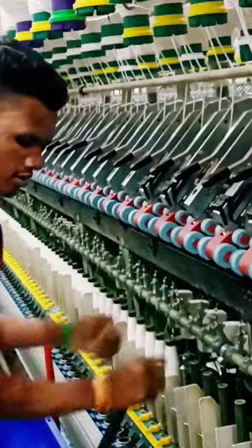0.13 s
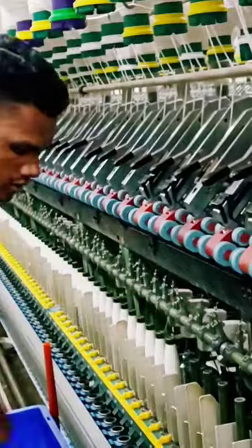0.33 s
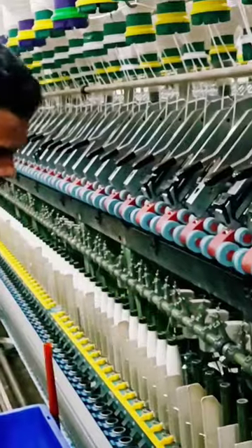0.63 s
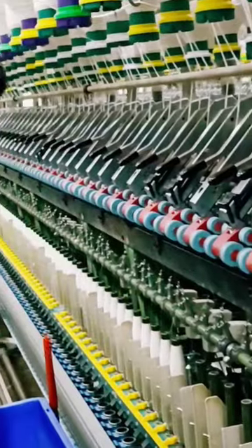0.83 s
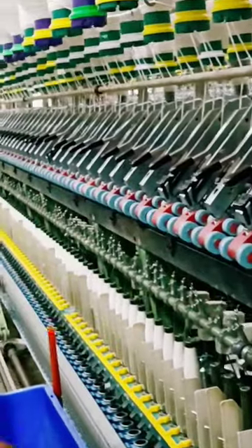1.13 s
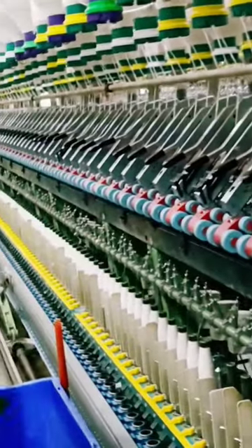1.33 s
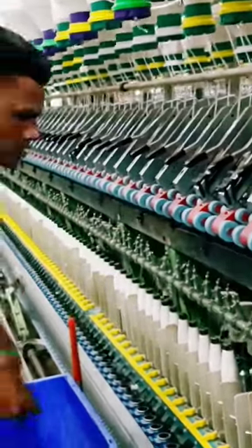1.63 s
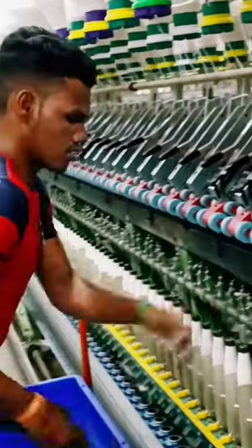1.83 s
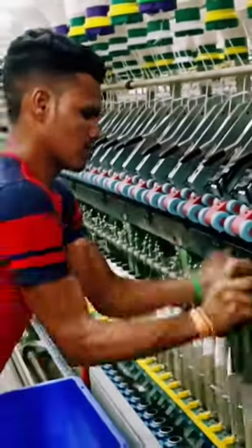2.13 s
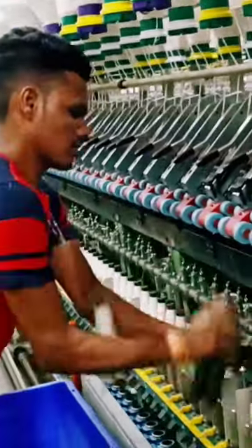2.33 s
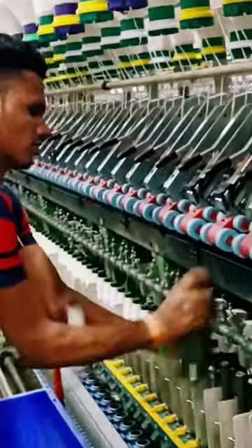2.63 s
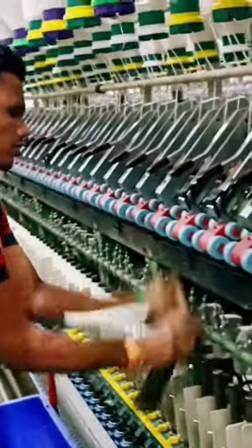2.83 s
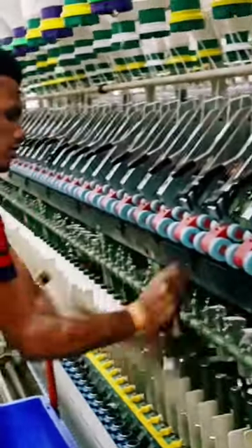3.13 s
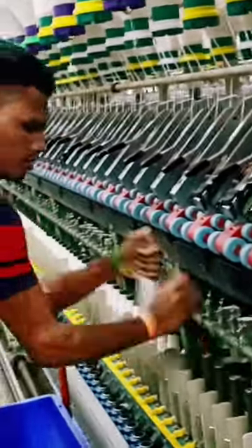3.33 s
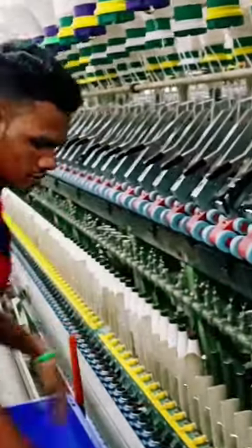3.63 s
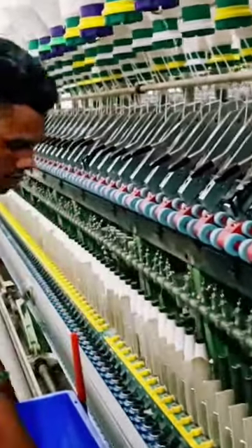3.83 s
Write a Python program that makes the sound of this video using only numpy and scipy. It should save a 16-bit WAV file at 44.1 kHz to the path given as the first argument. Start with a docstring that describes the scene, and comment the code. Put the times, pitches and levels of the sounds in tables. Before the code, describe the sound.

Inside a large spinning mill, constant broadband machine roar and fine ticking surround a wavering spindle drone; hollow bobbin tubes rattle close by a few times, picked up by a phone in slightly uneven stereo.

```python
"""Ring spinning hall

Rows of ring spinning frames run in a large hall, heard by a phone with two microphone ports.
Groups of spindles hum as wavering sines and narrow noise bands that beat; now and then plastic bobbin tubes
rattle in a crate close by, as swarms of clicks through resonances. Belts, rings and suction make a dense
roar with fine ticking, from shaped noise and clicks. The sound fades in from silence."""
import sys
import numpy as np
from scipy import signal
from scipy.fft import rfft, irfft
from scipy.io import wavfile
from scipy.ndimage import uniform_filter1d

SR = 44100
rng = np.random.default_rng(int(sys.argv[2]) if len(sys.argv) > 2 else 0)


def waveform_to_disk(signal):
    """Save audio, clipped to [-1, 1], as 16-bit WAV at the path in sys.argv[1]."""
    frames = np.transpose(np.atleast_2d(signal))
    scaled = np.clip(frames, -1, 1) * 32767
    samples = np.round(scaled).astype(np.int16)
    wavfile.write(sys.argv[1], SR, samples)


def invert_db(level):
    """Linear amplitude ratio for a level in decibels (20 dB per decade), elementwise."""
    return 10 ** (np.asarray(level, dtype=float) / 20)


N = 176400
HZ = np.fft.rfftfreq(N, 1 / SR)
T = np.arange(N) / SR


def curve(points):
    """Reads a table at every frequency, in straight lines on a log frequency axis."""
    p = np.array(points, float)
    return np.interp(np.log(HZ + 1), np.log(p[:, 0]), p[:, 1])


def set_rms(x, db):
    """Scales a signal to an rms level in dB."""
    return x * invert_db(db) / np.sqrt(np.mean(x ** 2))


def walk(rate):
    """Smooth random drift with about rate changes a second, rms 1."""
    hold = int(SR / rate)
    steps = np.repeat(rng.standard_normal(N // hold + 1), hold)
    smooth = uniform_filter1d(uniform_filter1d(steps, hold), hold)
    return set_rms(smooth[:N], 0)


def clicks(per_s, spread_db):
    """Single-sample clicks at random times, of either sign and uneven size, rms 1."""
    chance, sign, luck = rng.random((3, N))
    size = invert_db(spread_db * np.minimum(-np.log(1 - luck), 3))  # many small, few large
    return set_rms((chance < per_s / SR) * np.sign(sign - .5) * size, 0)


def whine(hz, spread_hz):
    """A sine of wavering pitch, rms 1, whose phase drifts between the two ports."""
    pitch = hz + spread_hz * walk(5)
    phase = 2 * np.pi * (np.cumsum(pitch) / SR + rng.random())
    port_drift = hz * 0.0014 * np.outer([.5, -.5], walk(3.94))  # radians, opposite at the two ports
    return np.sqrt(2) * np.sin(phase + port_drift)


def cluster(hz, spread_hz):
    """Many near-equal tones: a narrow noise band that beats at random, rms 1, partly unlike at the ports."""
    bell = np.exp(-.5 * ((HZ - hz) / spread_hz) ** 2)
    shared, opposed = (irfft(rfft(rng.standard_normal(N)) * bell, N) for _ in range(2))
    unlike = min(hz / 1250.0, 1)  # higher tones differ more
    return set_rms(shared + unlike * np.outer([1, -1], opposed), 0)


# Spindle groups. Each row: turning rate in Hz, spread of the fundamental in Hz,
# second harmonic in dB rms, third harmonic in dB rms.
SPINDLE_GROUPS = [(266.9, 0.45, -33.5, -43), (283.6, 0.55, -35, -43)]
# Fundamentals rising and falling as the spindles beat. Each row: time in seconds,
# first group's level in dB rms, second group's level in dB rms.
SPINDLE_BEATS = [(0.45, -33, -28.5), (0.53, -25.5, -36), (0.6, -31, -31), (0.67, -19.5, -27),
                 (0.91, -22, -32), (0.96, -32, -26.5), (1.19, -17, -33), (1.27, -22, -22),
                 (1.46, -48, -31.5), (1.52, -14.5, -29), (1.58, -43, -30), (1.76, -16.5, -30),
                 (1.85, -37, -24), (2.01, -39, -47), (2.05, -26, -31.5), (2.21, -31.5, -22),
                 (2.25, -28, -47), (2.3, -20.5, -35), (2.35, -31.5, -36), (2.44, -16, -34),
                 (2.48, -19.5, -32), (2.68, -34, -22.5), (2.95, -22, -25), (3.05, -41, -32),
                 (3.09, -17.5, -23), (3.26, -30.5, -29.5), (3.68, -19, -24.5), (3.84, -30, -28),
                 (3.93, -9, -37), (4.0, -72, -43)]


def spindles():
    """Each group hums at its turning rate, swelling as its spindles beat, with two blurred overtones."""
    beats = np.array(SPINDLE_BEATS, float)
    out = 0
    for k, (hz, spread, second_db, third_db) in enumerate(SPINDLE_GROUPS):
        beat_db = np.interp(T, beats[:, 0], beats[:, k + 1])
        out = out + invert_db(beat_db) * whine(hz, spread)
        out = out + invert_db(second_db) * cluster(2 * hz, 9.4 * spread)
        out = out + invert_db(third_db) * cluster(3 * hz, 10.0 * spread)
    return out


# Wavering motor, shaft and distant spindle tones. Each row: pitch in Hz, spread in Hz, level in dB rms.
MACHINE_TONES = [(191, 0.6, -38), (274.1, 1.56, -34), (393, 1, -46.5), (551.6, 5.4, -35.5), (580, 3.5, -44),
                 (417.4, 11.3, -40), (495, 2.5, -48), (213.3, 3, -43.5), (835, 2, -40), (1176, 0.43, -35),
                 (1633, 5, -40), (1860, 4, -53), (2480, 8, -44), (2636, 10, -47)]


def machine_tones():
    """Motors, shafts and distant spindles, each a narrow band of near-equal tones beating at random."""
    return sum(invert_db(db) * cluster(hz, spread) for hz, spread, db in MACHINE_TONES)


# Rattles of tubes in the crate. Each row: peak in seconds, level at the peak in dB,
# rise time constant in seconds, fall time constant in seconds.
TUBE_RATTLES = [(.71, -36, .01, 0.023), (.78, -11.5, 0.033, 0.02), (.83, -18, .014, 0.013),
                (0.866, -14, 0.0079, 0.015), (.888, -15.5, 0.015, 0.017), (1.515, -16.5, 0.019, .012),
                (3.95, -18.5, 0.027, 0.058)]
# Ring of a hollow tube. Each row: resonance in Hz, width in Hz, relative height in dB.
TUBE_RING = [(2140, 150, 8), (3910, 150, 14.5), (5600, 480, 11), (6200, 650, 7.5), (7860, 1100, 9.5),
             (12600, 800, 8), (14400, 1200, 11.5), (6000, 8000, -7)]


def tubes():
    """Swarms of small knocks build up and die away, ringing hollow plastic tubes; they share the roar's colour."""
    knocks_per_s, knock_spread_db = 4000, 2.5
    right_db = 3  # right port over left
    swarm = sum(invert_db(db) * np.exp(np.minimum((T - peak) / rise, (peak - T) / fall))
                for peak, db, rise, fall in TUBE_RATTLES)
    ring_power = sum(invert_db(2 * db) / (1 + ((HZ ** 2 - hz ** 2) / ((HZ + 1) * width)) ** 2)
                     for hz, width, db in TUBE_RING)
    ring = invert_db(curve(PICKUP_COLOUR)) * np.sqrt(ring_power)
    ring = ring / np.sqrt(np.mean(ring ** 2))
    # each port gets its own knocks
    pair = [irfft(rfft(swarm * clicks(knocks_per_s, knock_spread_db)) * ring, N) for _ in range(2)]
    return np.array(pair) * invert_db(np.array([[0], [right_db]]))


# Colour of the hall roar as the phone's microphones pick it up, with a dip near 9.3 kHz; the tubes share it.
# Each row: frequency in Hz, relative density in dB per Hz.
PICKUP_COLOUR = [(25, -26), (55, -25.5), (95, -8), (200, -3.5), (400, -5), (700, -6), (1000, -4.5),
                 (1300, -0.5), (2000, 1.5), (2700, 0.5), (3300, -4), (3900, -7), (4400, -14.5), (5700, -10),
                 (6800, -12), (7600, -17), (8500, -27), (9300, -31), (10300, -20), (11500, -17.5),
                 (13000, -16), (15000, -23.5), (16000, -27)]
# Likeness of the two ports in the diffuse hall sound. Each row: frequency in Hz, correlation from -1 to 1.
PORT_LIKENESS = [(30, .94), (60, 1), (110, 1), (250, 0.94), (450, 0.81), (700, 0.5), (1000, 0.25),
                 (1500, -0.18), (2200, -0.035)]


def roar():
    """Noise and ticks whose half-octave bands swell together and flicker alone; the ports agree in the bass."""
    roar_db = -14.5  # rms of the whole roar
    ticks_per_s, tick_db, tick_spread_db = 2500, -8, 2.5  # tick level is against the noise
    swell_db, flicker_db = .25, 1.0  # rms of the level changes
    ripple_hz, ripple_db = 35, 1.5  # spacing and depth of many small resonances, fading in the treble
    a, b = (rfft(rng.standard_normal(N) + invert_db(tick_db) * clicks(ticks_per_s, tick_spread_db))
            for _ in range(2))
    like = np.clip(curve(PORT_LIKENESS), -.999, .999)
    ports = np.array([a, like * a + np.sqrt(1 - like ** 2) * b])
    ripple = np.interp(HZ, np.arange(1000) * ripple_hz, rng.standard_normal(1000))
    colour = invert_db(curve(PICKUP_COLOUR) + ripple_db * ripple / (1 + (HZ / 4000) ** 2))
    place = 2 * np.log2((HZ + 1) / 20)  # half-octaves above 20 Hz
    swell = walk(3)
    out = 0
    for k in range(21):
        band = irfft(ports * colour * np.clip(1 - abs(place - k), 0, 1), N)
        out = out + band * invert_db(swell_db * swell + flicker_db * walk(12))
    return set_rms(out, roar_db)


def scene():
    """Spindles, machine tones, tubes and roar together in the hall."""
    return spindles() + machine_tones() + tubes() + roar()


# Right port against left. Each row: frequency in Hz, gain in dB.
RIGHT_PORT = [(400, 0), (800, -2), (1300, -3.5), (2300, -8), (3500, -10.5), (4400, -4.5), (5800, -7),
              (7200, -7), (8500, 1), (10300, -3.5), (11500, -2.5), (13000, -6), (14500, -19), (15500, -10)]


def right_port(x):
    """Filters the sound at the right port, which is mostly duller than the left."""
    return irfft(rfft(x) * invert_db(curve(RIGHT_PORT)), N)


def fade_in():
    """Gain that stays at silence, opens softly to a low step, then climbs in a straight line to full."""
    start_s, open_s = 0.17, 0.013
    climb_s, step = 0.28, 0.047  # time for a climb of 1, gain it starts from
    opening = np.clip((T - start_s) / open_s, 0, 1) ** 2
    return opening * np.clip(step + (T - start_s) / climb_s, 0, 1)


def band_limit(x):
    """A steep low-pass at the top of the band."""
    return signal.sosfilt(signal.butter(12, 15530, fs=SR, output="sos"), x)


def record(dry):
    """Colours the right port, fades in from silence and clips at full scale."""
    ports = np.array([dry[0], right_port(dry[1])])
    mix = np.clip(ports * fade_in(), -1, 1)
    return band_limit(mix)


dry = scene()
out = record(dry)
waveform_to_disk(out)
```